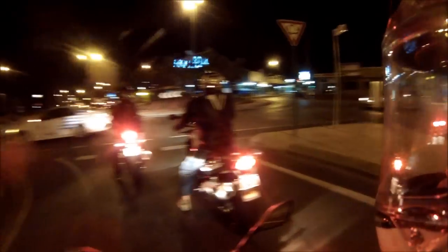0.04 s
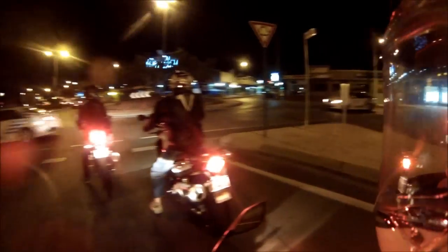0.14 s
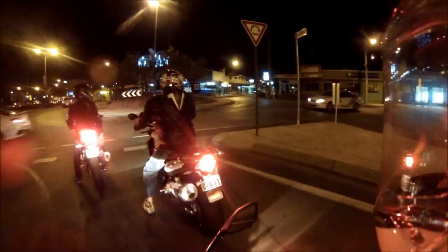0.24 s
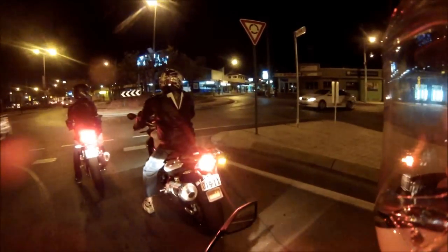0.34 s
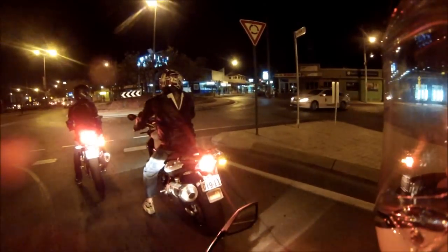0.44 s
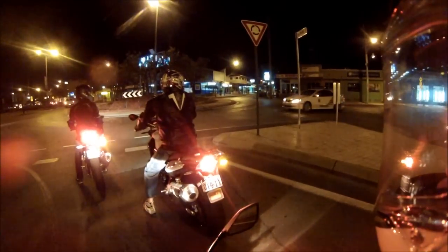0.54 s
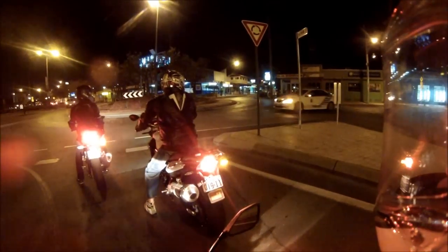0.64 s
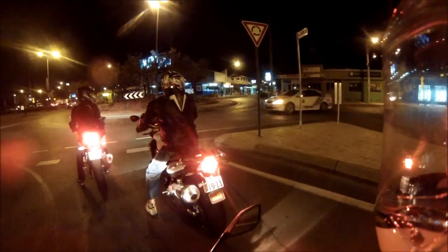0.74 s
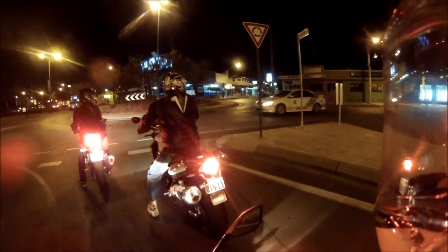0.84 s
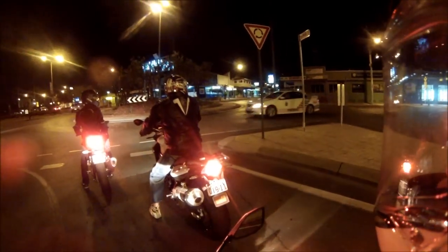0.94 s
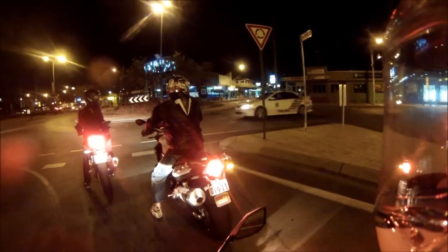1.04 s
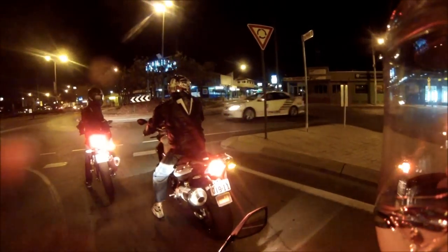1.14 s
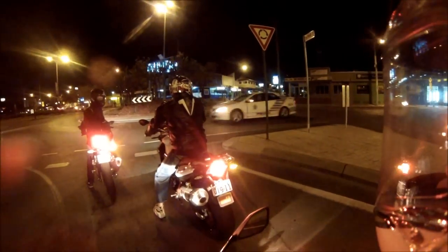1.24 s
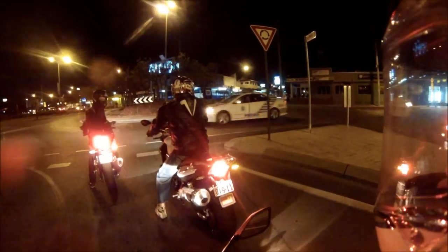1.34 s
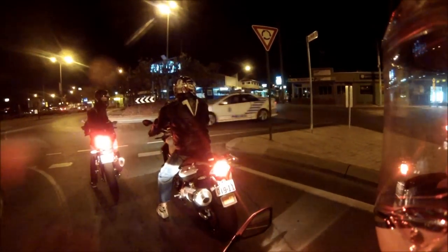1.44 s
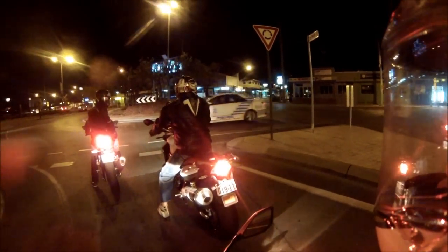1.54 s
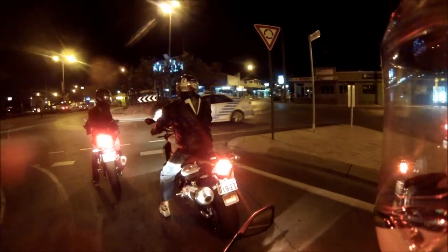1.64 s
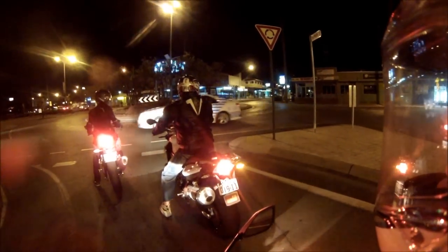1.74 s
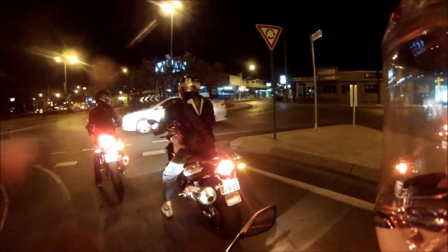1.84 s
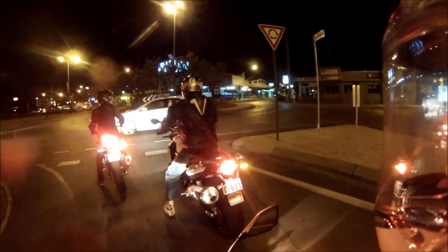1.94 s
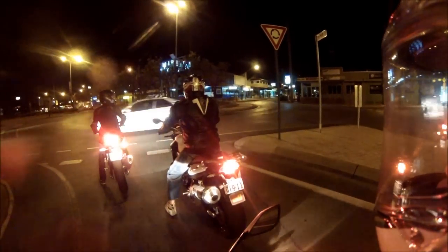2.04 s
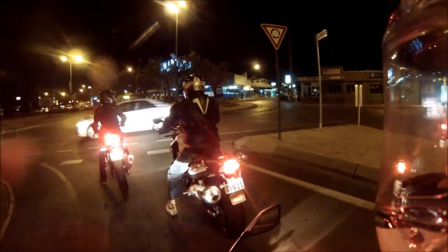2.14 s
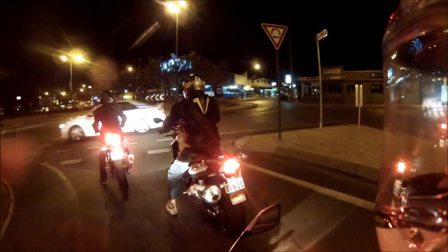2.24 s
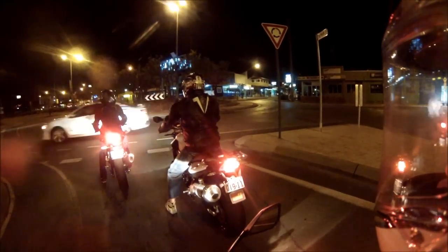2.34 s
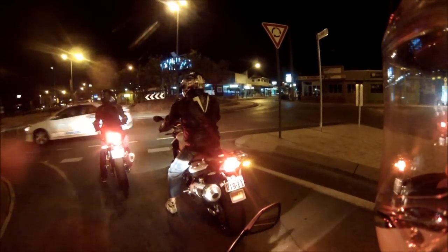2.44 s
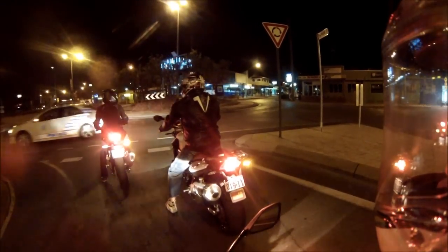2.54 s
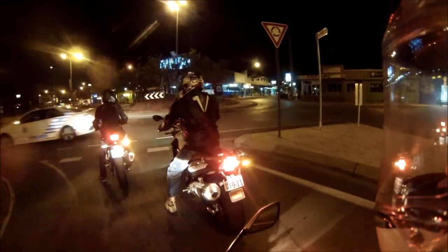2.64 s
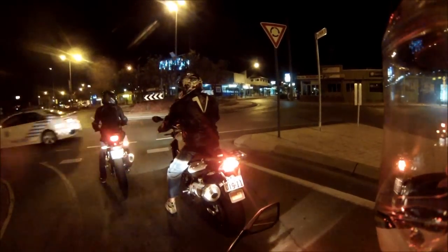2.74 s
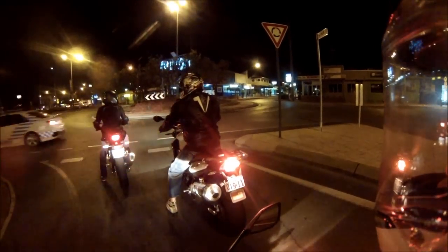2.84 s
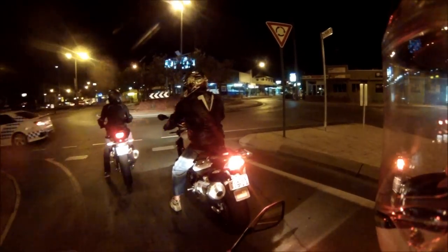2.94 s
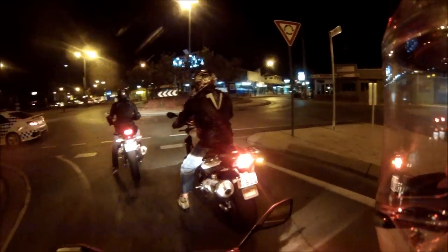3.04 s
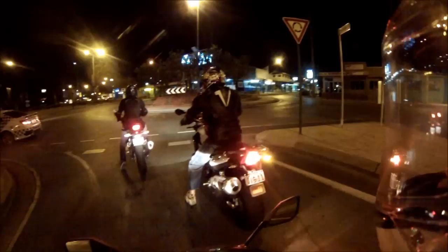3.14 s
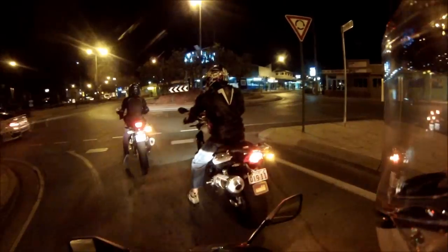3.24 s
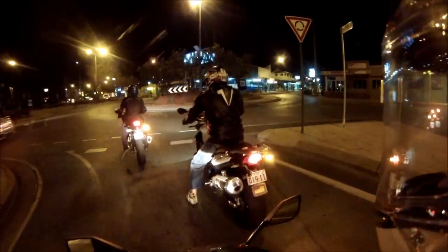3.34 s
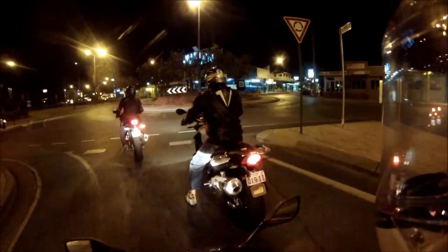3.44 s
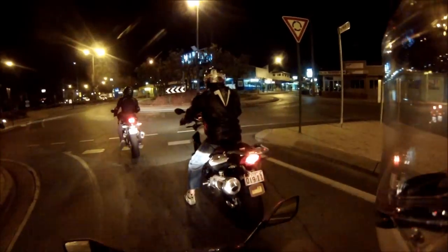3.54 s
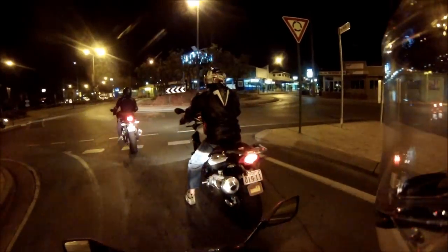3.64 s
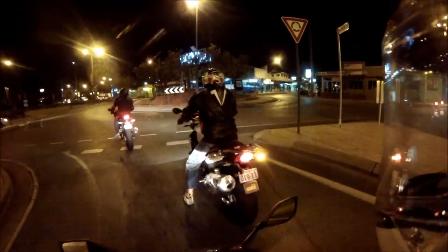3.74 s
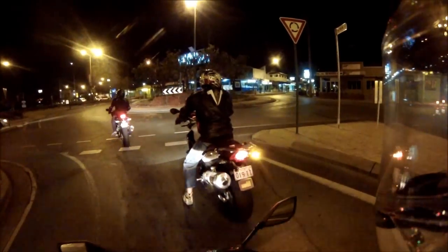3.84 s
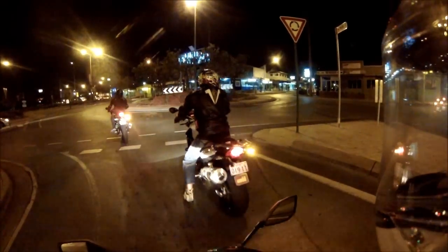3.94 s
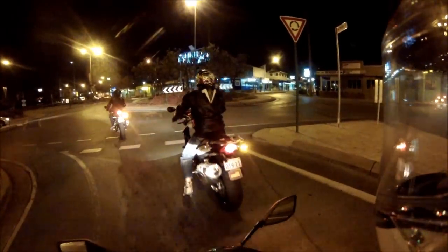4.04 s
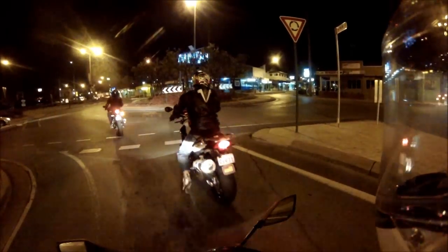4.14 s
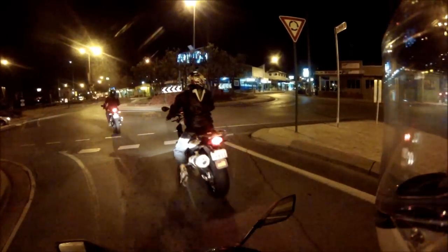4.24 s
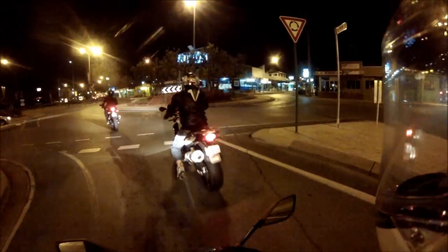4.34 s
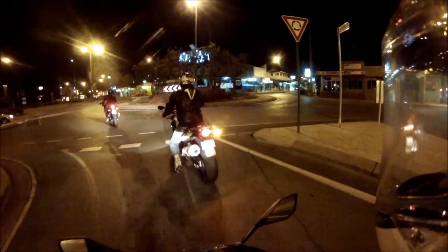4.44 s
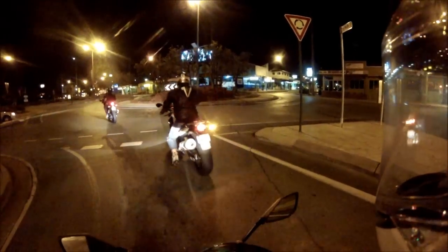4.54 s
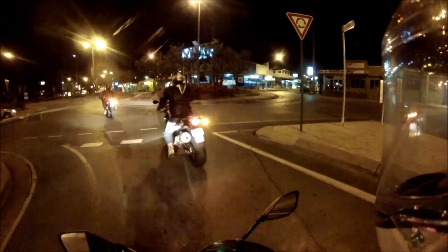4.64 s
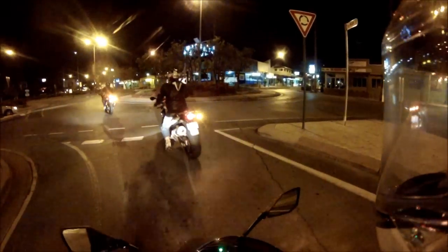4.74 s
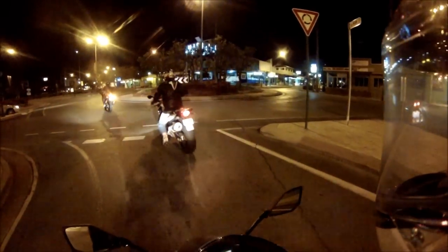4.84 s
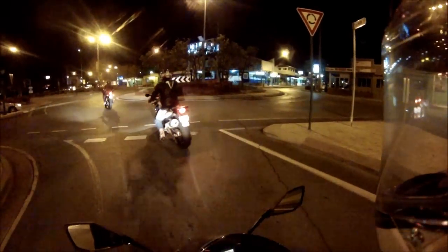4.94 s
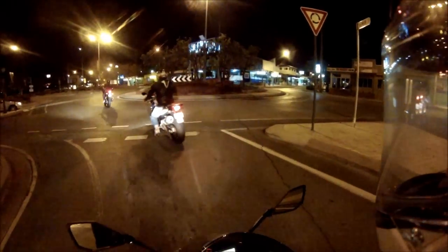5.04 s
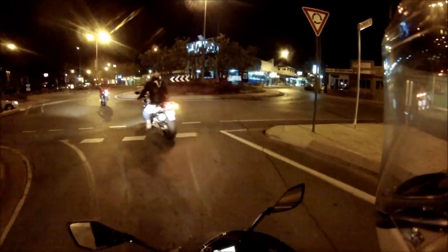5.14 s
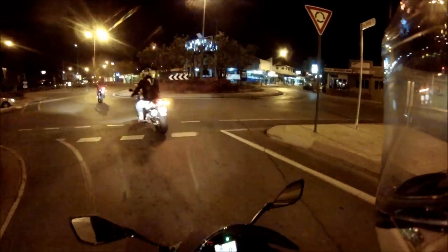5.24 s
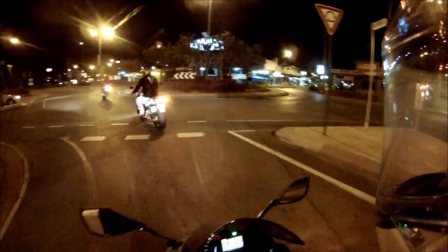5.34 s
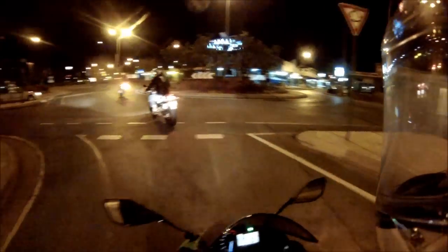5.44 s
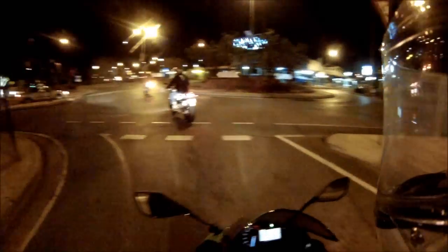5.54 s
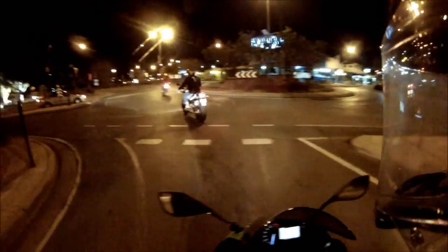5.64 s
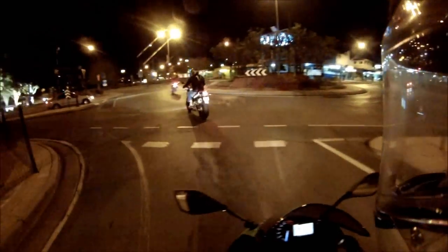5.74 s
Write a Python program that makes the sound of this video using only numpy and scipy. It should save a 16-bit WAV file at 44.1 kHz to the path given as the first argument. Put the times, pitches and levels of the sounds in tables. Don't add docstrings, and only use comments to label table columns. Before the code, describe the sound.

Heard from a rider's helmet at a night junction: a brief gust and dull knocks die away over a low, even four-cylinder idle, faint town murmur and a light ticking from the smaller bike ahead. Near three seconds a farther bike whines and rattles off, the one ahead revs raspily and leaves, then the rider's own engine surges with a deep bark and gear whine, with more dull knocks.

```python
import sys
import numpy as np
from scipy import signal
from scipy.fft import rfft, irfft, next_fast_len
from scipy.io import wavfile
from scipy.ndimage import uniform_filter1d

SR = 44100
rng = np.random.default_rng(int(sys.argv[2]) if len(sys.argv) > 2 else 0)


def store_pcm(level_fs):
    pcm = np.round(np.clip(level_fs, -1, 1) * 32767).astype(np.int16)
    wavfile.write(sys.argv[1], SR, np.atleast_2d(pcm).T)


def undo_db(level):
    steps = np.asarray(level, float) / 20
    return 10 ** steps


N = 254898

# frequency in Hz, density in dB per Hz.
MURMUR = [(220, -20), (270, -6), (330, -5), (400, -3), (500, -5), (620, -12), (800, -17), (1000, -19),
          (1200, -40)]
RUMBLE_DB = -47
WIND_DB, GUST_DB, GUST_FADE_S, BREEZE_DB = -50.5, 15, 0.12, 3

# frequency in Hz, density in dB per Hz.
CLATTER = [(530, -34), (900, -12), (1020, -9), (1150, -3), (1470, 3), (1710, -3), (1880, -2.5), (2190, -4),
           (2900, -13), (3770, -9), (6380, -120)]
SIZZLE = [(1530, -8), (2600, -3.5), (2880, -16), (3260, 2), (3460, -3), (3750, -3), (4320, -9),
          (4750, -1.5), (5960, -12), (6660, -12), (7540, -9), (8420, -14.5), (9610, -15.5), (11700, -17),
          (15000, -21.5)]
INTAKE = [(5600, -32), (6200, -8), (6700, -5), (7400, -12), (8200, -21), (9500, -28)]
# idle level in dB, gain from the bike ahead in dB,
# steepness of that gain (no unit), gain from own throttle in dB, gain from the far bike in dB.
MACHINERY = [(-55.5, 6, 4.2, 2.3, 0.59), (-63.5, 7.5, 2.8, 1.8, 3), (-77.5, 15.5, 3.2, 3.8, 3.1),
             (-62, 9.8, 1, .2, 1.6)]

# start in seconds, peak level in dB, pitch in Hz, t60 in seconds.
KNOCKS = [
    (.075, -30, 47, 0.3),
    (.165, -32, 45, 0.12),
    (2.7, -42, 100.4, 0.28),
    (2.92, -34, 95, 0.22),
    (5.293, -32, 52, 0.038),
    (5.35, -29, 54.7, 0.1),
    (5.55, -66, 50, 0.15),
    (5.62, -49, 52.4, 0.26),
]

# time in seconds, gear whine in Hz, effort as heard from 0 to 1.
FAR = [
    (2.55, 691, 0.05),
    (2.95, 705, 0.8),
    (3.1, 716, 0.98),
    (3.5, 760, 0.72),
    (3.7, 760, 0.08),
]
FAR_RATTLE_DB, FAR_FADE_DB = -59, 17
FAR_WHINE_DB, FAR_GEAR_S = -65, 3.03

# start in seconds, peak level in dB.
TICKS = [(.0513, -48), (0.148, -43.5), (.2463, -45), (.3421, -51.5), (0.4385, -49), (0.5349, -44.5),
         (.634, -43.5), (0.7314, -46), (.829, -47.5), (.9268, -49.5), (1.024, -43), (1.1209, -52),
         (1.2213, -44.5), (1.3216, -44.5), (1.4192, -46), (1.5174, -48.5), (1.6165, -46), (1.8108, -46.5),
         (1.862, -48), (2.0178, -52), (2.0677, -43), (2.218, -45), (2.2682, -44), (2.3212, -45.5),
         (2.419, -43), (2.5202, -47.5), (2.618, -48), (2.7148, -49), (2.814, -44.5), (2.9105, -44)]
TICK_HZ, TICK_SCATTER = 3365, .005
SLACK_S, SLACK_DB, SLACK_SCATTER_DB = .049, -20.5, 6.5

# time in seconds, crank rate in Hz, effort as heard from 0 to 1.
AHEAD = [(0, 20.46, 0), (3, 20.42, 0.1), (3.2, 24.32, 0), (3.35, 33.95, 0.56), (3.53, 47.9, 0.87),
         (3.61, 52.44, 0.95), (3.7, 54.2, 0.98), (3.86, 52.74, 0.98), (4.04, 48.78, 0.92),
         (4.17, 46.57, 0.93), (4.3, 44.4, 0.88), (4.55, 42.8, 0.77), (4.8, 41.85, 0.78), (5.78, 40, 0.57)]
# centre in Hz, width in Hz, level in dB.
AHEAD_THUMP = [(50, 29, -3.5), (95, 19.3, -11.5)]
AHEAD_RASP = [(315, 27, -7), (413, 21, -2.5), (494.7, 23, 6.5), (590, 58, -8), (725, 40, 1),
              (1260, 47, -21.5)]
# idle level in dB, full level in dB, steepness (no unit).
AHEAD_LAYERS = [(-51, -38, 1.6), (-80, -45.5, 0.79), (-82, -55.5, 2.8)]

# time in seconds, firing rate in Hz, throttle from 0 to 1.
RIDE = [(0, 34.95, 0), (.12, 33.03, 0), (.21, 37.03, 0.14), (.36, 35.11, 0), (.9, 34.98, 0),
        (3.45, 35.96, 0.06), (3.7, 38.66, 0.07), (4.28, 34.53, 0), (4.399, 40, 0.09), (4.5, 52.1, 0.5),
        (4.61, 70.06, 0.82), (4.721, 76.66, 1), (4.88, 70.96, 0.89), (5.25, 63.88, 0.59), (5.36, 61.1, .4),
        (5.46, 59.66, 0.46), (5.66, 57.5, 0.61), (5.78, 56.87, 0.48)]
HUNT_HZ, HUNT_PERIOD_S, HUNT_TOP_S = 0.721, .505, .5
IDLE_HZ, PULL_SPAN_HZ = 37.85, 8.73
CLUTCH_HOME_S, CLUTCH_TAKES_S = 5.4, 0.036
# centre in Hz, width in Hz, level in dB.
BOOM = [(40, 7.7, 0), (70.8, 25, 7.5), (114.6, 47, -1.5)]
PIPE = [(147.9, 28.8, -2), (190.8, 44.3, 3), (217.3, 35.9, 3.5), (248.4, 81.5, -13)]
BARK = [(282, 10.5, 1), (326, 15, 7), (401.5, 40, 5.5)]
SNARL = [(451.7, 30.4, 4), (488, 113, -9), (594, 57, -10), (698, 87, -21.5), (738, 37, -15)]
# meshes per firing, skirt width in Hz, clean share (no unit), level in dB.
TEETH = [(20.1, 300, 1.1, 0), (19.5, 200, .9, -9), (30, 300, .9, -9), (40, 350, .9, -8),
         (60, 400, .7, -9.5)]
# centre in Hz, width in Hz, level in dB.
HOUSING = [(1350, 1000, 0), (2350, 600, -3), (3800, 600, -1)]
# idle level in dB, gain at full throttle in dB,
# gain on song in dB, gain once the clutch is home in dB.
LAYERS = [(-43.5, 11.5, .8, -0.6), (-45.5, 1.5, 9.5, 2), (-64, 7, 19.5, 4), (-67.5, 15.5, 12, -3.5),
          (-74.5, -1.5, 18.5, -2)]
MESH_FROM_HZ, MESH_QUIET_DB_PER_HZ = 58, 1.5
PATCHY_DB = 2.2


def unit(x):
    return x / np.sqrt(np.mean(x ** 2))


def curves(table):
    s, *columns = np.transpose(table)
    return [np.interp(np.arange(N) / SR, s, c) for c in columns]


def swell(rows, effort):
    effort = np.clip(effort, 0, 1)
    return [idle_db + (full_db - idle_db) * effort ** steep for idle_db, full_db, steep in rows]


def band(x, hz, width):
    return signal.lfilter(*signal.iirpeak(hz, hz / width, SR), x)


def ring(x, modes):
    return sum((-1) ** k * undo_db(db) * band(x, hz, w) for k, (hz, w, db) in enumerate(modes))


def walk(rate):
    k = int(SR / rate)
    held = np.repeat(rng.standard_normal(N // k + 1), k)
    return 0.85 * uniform_filter1d(uniform_filter1d(held, k), k)[:N]


def coloured(points, flicker_db, drift_db):
    size = next_fast_len(N)
    f = np.fft.rfftfreq(size, 1 / SR) + 1
    hz, db = np.transpose(points)
    shape = undo_db(np.interp(np.log(f), np.log(hz), db, left=-90, right=-90))
    spectrum = rfft(rng.standard_normal(size)) * shape
    place, out = 2 * np.log2(f), 0
    for c in range(int(2 * np.log2(hz[0])), int(2 * np.log2(hz[-1])) + 2):
        strip = irfft(spectrum * np.clip(1 - abs(place - c), 0, 1), size)[:N]
        out = out + strip * undo_db(flicker_db * walk(24.95))
    return unit(out * undo_db(drift_db * walk(2.64)))


def whine(hz, width, clean):
    turn = 2 * np.pi * np.cumsum(hz) / SR
    return (np.sqrt(2) * clean + walk(width)) * np.cos(turn) + walk(width) * np.sin(turn)


def fire(hz, pattern_db, scatter_db, jitter, start):
    turns = start + np.cumsum(hz) / SR
    k = np.arange(1, int(turns[-1]))
    chance = rng.standard_normal((1000, 2))[:len(k)]
    at = np.interp(k + jitter * chance[:, 0], turns, np.arange(N - 0.))
    i = np.minimum(at.astype(int), N - 2)
    size_db = np.array(pattern_db)[k % len(pattern_db)] + scatter_db * chance[:, 1]
    size = undo_db(size_db) * SR / hz[i]
    pulses = np.zeros(N)
    np.add.at(pulses, i, size * (1 - at + i))
    np.add.at(pulses, i + 1, size * (at - i))
    return pulses, turns % 1


def strikes(rows, rise_s):
    out = np.zeros(N)
    for s, db, hz, t60 in rows:
        i = int(s * SR)
        t = np.arange(min(int(t60 * SR), N - i)) / SR
        shape = (1 - np.exp(-t / rise_s)) ** 2 * np.exp(-np.log(1000) * t / t60)
        out[i:i + len(t)] += undo_db(db) * shape / shape.max() * np.sin(2 * np.pi * hz * t)
    return out


def machinery_levels():
    ahead, own, far = (np.clip(curves(bike)[1], 0, 1) for bike in (AHEAD, RIDE, FAR))
    far = far * (np.arange(N) / SR > FAR[0][0])
    return [idle_db + ahead_db * ahead ** steep + own_db * own + far_db * far
            for idle_db, ahead_db, steep, own_db, far_db in MACHINERY]


def town_and_wind(murmur_db):
    murmur = undo_db(murmur_db) * coloured(MURMUR, flicker_db=.5, drift_db=.2)
    wind_db = WIND_DB + GUST_DB * np.exp(-np.arange(N) / SR / GUST_FADE_S)
    buffeting = band(band(rng.standard_normal(N), 11, 10), 11, 14)
    wind = undo_db(wind_db + BREEZE_DB * walk(2.5)) * unit(buffeting)
    low = band(band(rng.standard_normal(N), 30, 41), 64, 78)
    rumble = undo_db(RUMBLE_DB + 2.7 * walk(5.03)) * unit(low)
    return murmur + wind + rumble


def machinery(own_phase, ahead_phase, clatter_db, sizzle_db, intake_db):
    beat = 1 + 0.07 * np.cos(2 * np.pi * own_phase) + 0.064 * np.cos(2 * np.pi * ahead_phase)
    clatter = undo_db(clatter_db) * unit(beat * coloured(CLATTER, flicker_db=1.4, drift_db=.2))
    sizzle = undo_db(sizzle_db) * unit(beat * coloured(SIZZLE, flicker_db=1.2, drift_db=-1.2))
    intake = undo_db(intake_db) * coloured(INTAKE, flicker_db=1.8, drift_db=3.0)
    return clatter + sizzle + intake


def helmet_knocks():
    return strikes(KNOCKS, rise_s=.004)


def far_bike():
    hz, effort = curves(FAR)
    t = np.arange(N) / SR
    rattle_db = FAR_RATTLE_DB - FAR_FADE_DB * (1 - effort)
    whine_db = FAR_WHINE_DB - 20 * (1 - effort) - 20 * np.clip((FAR_GEAR_S - t) / .08, 0, 1)
    gate = 0.24 + np.exp(-(23.0 * t % 1) / 0.15) * undo_db(3.3 * walk(25.6))
    noise = gate * rng.standard_normal(N)
    low_tin = band(band(noise, 1840, 500), 1777, 700)
    high_tin = band(band(noise, 4770, 350), 4700, 500)
    rattle = unit(low_tin + undo_db(-5.5) * high_tin)
    heard = (t > FAR[0][0]) & (t < FAR[-1][0])
    return heard * (undo_db(whine_db) * whine(hz, width=40, clean=1.7) * .5 + undo_db(rattle_db) * rattle)


def ticks():
    rows = [(s, db, TICK_HZ * (1 + TICK_SCATTER * rng.standard_normal())) for s, db in TICKS]
    rows += [(s + SLACK_S, db + SLACK_DB + SLACK_SCATTER_DB * rng.standard_normal(), hz)
             for s, db, hz in rows]
    main = strikes([(s - .0012, db, hz, .0125) for s, db, hz in rows], rise_s=.02)
    side = strikes([(s, db - 17.0, hz * 1.1, .02) for s, db, hz in rows], rise_s=0.001)
    top = strikes([(s, db - 16.5, hz * 2.05, .01) for s, db, hz in rows], rise_s=0.00055)
    return main + side + top


def bike_ahead():
    hz, effort = curves(AHEAD)
    thump_db, rasp_db, whine_db = swell(AHEAD_LAYERS, effort)
    lumpy, phase = fire(hz, pattern_db=[0, -1.2], scatter_db=.9, jitter=.004, start=.7)
    even, _ = fire(hz, pattern_db=[0, -.6], scatter_db=.6, jitter=.0012, start=.7)
    thump = unit(ring(band(lumpy, 109, 170), AHEAD_THUMP))
    drone = unit(band(band(even, 144.4, 30), 157, 36))
    rasp = unit(ring(band(band(even, 514, 600), 380, 1500), AHEAD_RASP))
    rasp = rasp - (1 - np.clip(effort, 0, 1) ** 3.8) * band(rasp, 766, 420)
    gears = whine(36.5 * hz, width=220, clean=1.1) + whine(34.5 * hz, width=220, clean=.9)
    gears = gears + undo_db(-5) * whine(28 * hz, width=300, clean=.5)
    exhaust = undo_db(thump_db) * thump + undo_db(rasp_db) * (rasp + undo_db(4.0) * drone)
    return exhaust + undo_db(whine_db - 2) * gears, phase


def own_bike():
    t = np.arange(N) / SR
    hz, throttle = curves(RIDE)
    song = 1 - np.exp(-np.maximum(hz - IDLE_HZ, 0) / PULL_SPAN_HZ)
    hz = hz + (1 - song) * HUNT_HZ * np.cos(2 * np.pi * (t - HUNT_TOP_S) / HUNT_PERIOD_S)
    home = .5 + .5 * np.tanh((t - CLUTCH_HOME_S) / CLUTCH_TAKES_S)
    *exhaust_db, whine_db = [idle_db + open_db * throttle + song_db * song + home_db * home
                             for idle_db, open_db, song_db, home_db in LAYERS]
    unloaded_db = (1 - home) * song * MESH_QUIET_DB_PER_HZ * np.maximum(MESH_FROM_HZ - hz, 0)
    whine_db = whine_db + PATCHY_DB * walk(14) - unloaded_db

    pulses, phase = fire(hz, pattern_db=[0, -1.1, .2, -.9], scatter_db=.5, jitter=.0025, start=.9)
    pipe = ring(band(pulses, 195, 306), PIPE)
    boom = ring(band(pulses, 89.5, 140), BOOM)
    bark = ring(band(band(pulses, 309, 180), 332, 215), BARK)
    snarl = ring(band(band(pulses, 543, 350), 530, 400), SNARL)
    exhaust = sum(undo_db(db) * unit(x) for x, db in zip((pipe, boom, bark, snarl), exhaust_db))

    gears = sum(undo_db(db) * whine(k * hz, skirt, clean) for k, skirt, clean, db in TEETH)
    gears = sum(undo_db(db) * band(gears, f, w) for f, w, db in HOUSING)
    load = 1 + .6 * np.cos(2 * np.pi * phase)
    return -exhaust + undo_db(whine_db) * gears * load, phase


def scene():
    *machine_db, murmur_db = machinery_levels()
    own, own_phase = own_bike()
    ahead, ahead_phase = bike_ahead()
    near = own + ahead + ticks()
    lag = int(.021 * SR)
    echo = np.concatenate([np.zeros(lag), near[:-lag]])
    background = town_and_wind(murmur_db) + machinery(own_phase, ahead_phase, *machine_db)
    mix = background + helmet_knocks() + far_bike() + near + undo_db(-18.5) * echo
    return mix[None, :]


def top_cut(x):
    return signal.sosfilt(signal.butter(12, 15190, fs=SR, output="sos"), x)


def record(dry):
    return top_cut(dry)


dry = scene()
out = record(dry)
store_pcm(out)
```